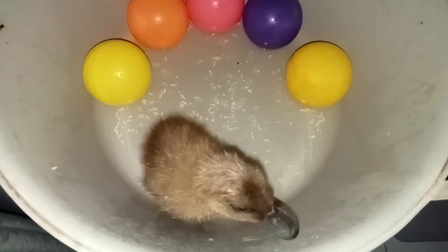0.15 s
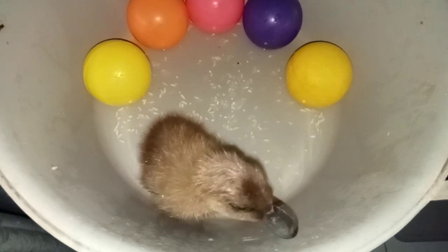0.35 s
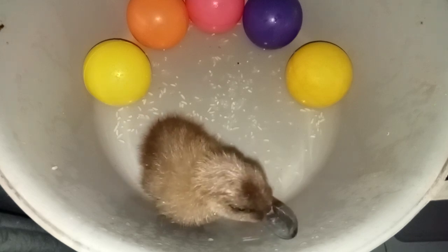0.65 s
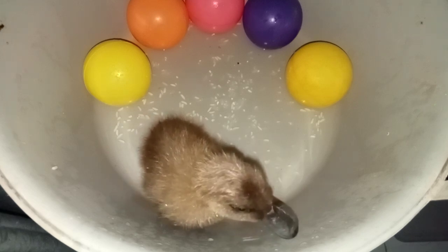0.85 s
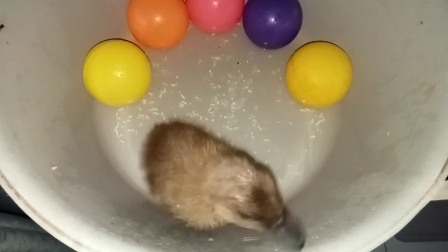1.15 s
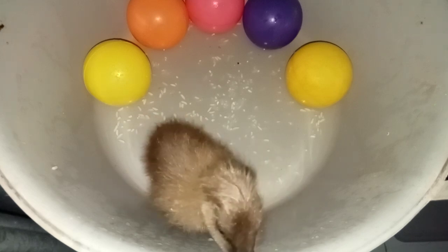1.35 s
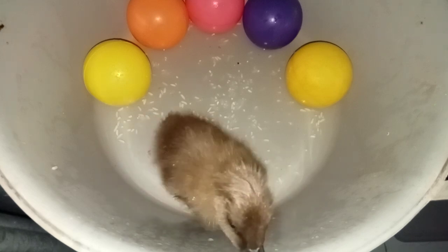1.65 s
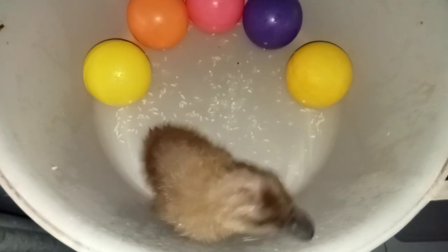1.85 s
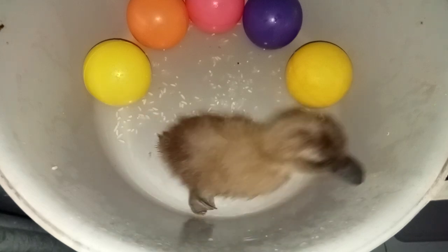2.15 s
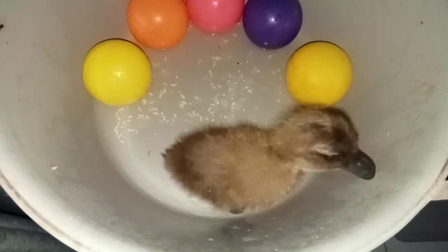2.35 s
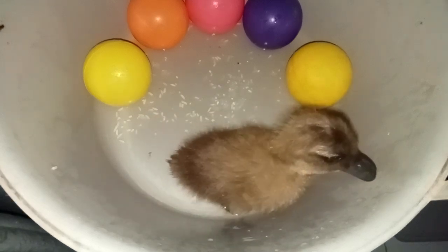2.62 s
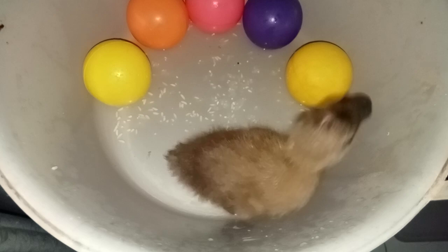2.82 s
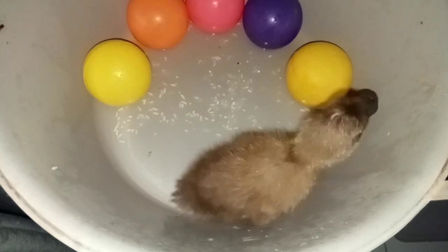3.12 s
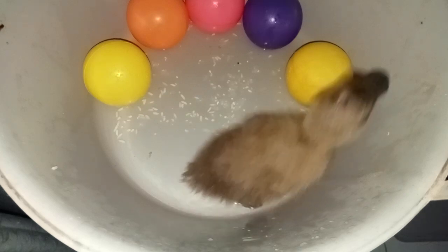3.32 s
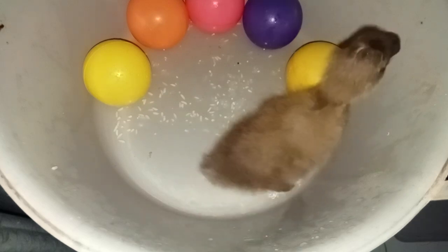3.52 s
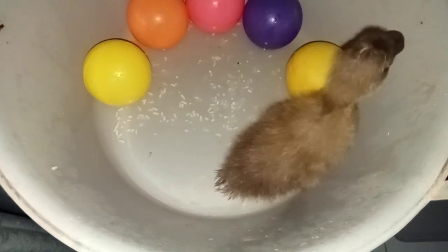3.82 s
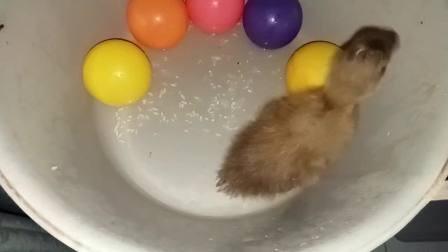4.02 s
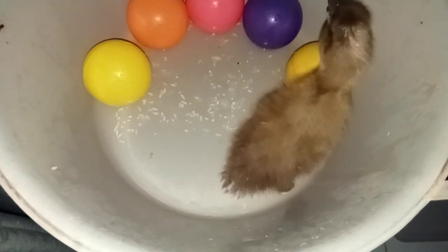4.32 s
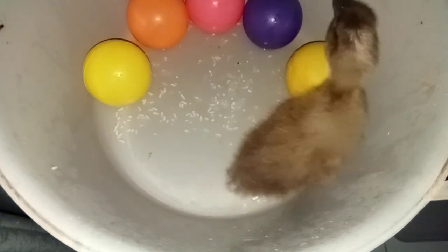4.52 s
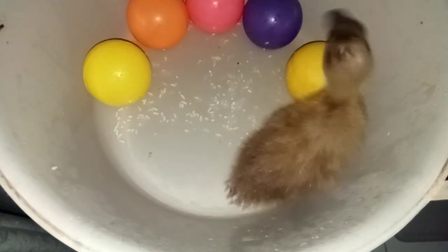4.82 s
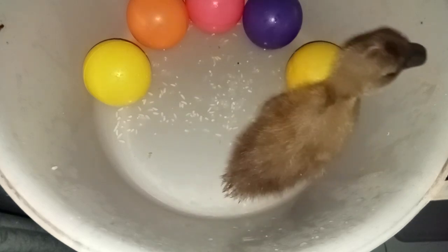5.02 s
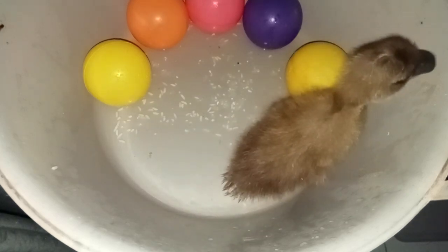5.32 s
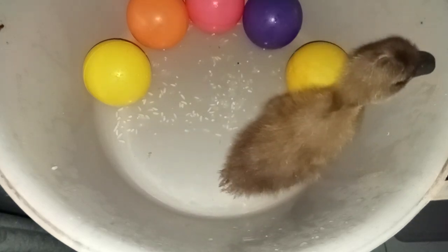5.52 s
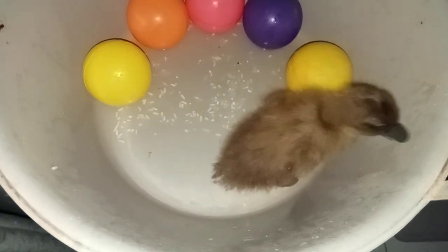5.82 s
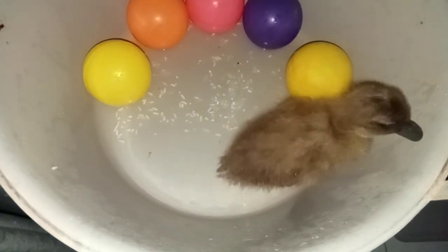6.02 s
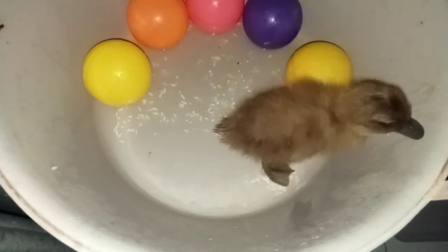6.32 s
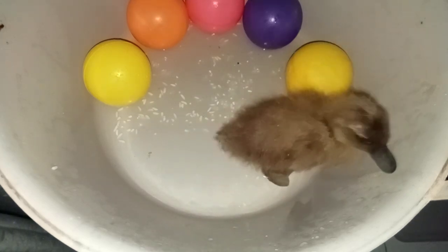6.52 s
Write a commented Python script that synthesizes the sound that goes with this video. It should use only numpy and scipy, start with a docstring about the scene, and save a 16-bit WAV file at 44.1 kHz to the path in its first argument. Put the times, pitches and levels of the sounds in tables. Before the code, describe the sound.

Thin whistled duckling calls, each scooping up and dropping off quickly, repeat at an even pace in a small reverberant indoor space. They grow from timid to piercing, interrupted by a crisp scuff of claws or bill on plastic, then rasp and weaken. After a short pause, a foot taps and a last quiet peep follows. Close mono microphone, faint hum and rumble.

```python
"""A duckling peeps about four times a second, close by, in a plastic bucket in a small hard room.
Each peep is a whistle with four overtones that scoops up, climbs and drops; the first are soft,
and the last whole ones turn hoarse as the cycles of the voice grow uneven.
Scuffs are grains of friction, taps ring the modes of the plastic, and thuds are dull low noise.
The room answers with dying noise; a faint hum, hiss and rumble lie below."""
import sys
import numpy as np
from scipy import signal
from scipy.fft import rfft, irfft, next_fast_len
from scipy.io import wavfile

SR = 44100
rng = np.random.default_rng(int(sys.argv[2]) if len(sys.argv) > 2 else 0)


def voltage_ratio(decibels):
    """Convert decibels (scalar or array-like) to amplitude ratios, 20 dB per decade."""
    exponent = np.asarray(decibels, float) / 20
    return 10 ** exponent


def file_out(sig):
    """Save sig as 16-bit WAV at sys.argv[1]."""
    # one column per channel
    cols = np.atleast_2d(sig).T
    # limit, then scale
    lim = np.clip(cols, -1, 1)
    pcm = np.round(lim * 32767).astype(np.int16)
    wavfile.write(sys.argv[1], SR, pcm)


N = 293706

# full peeps: start_s, length_s, low_pitch_hz, top_pitch_hz, strength_db
FULL_PEEPS = [(1.467, 0.09, 2690, 3022, -23), (1.736, 0.1, 2882, 3260, -19.5),
              (2, 0.095, 2565, 3239, -18.5), (2.258, 0.099, 3060, 3425, -18.5),
              (2.52, 0.1, 3110, 3512, -16.5), (2.78, 0.11, 3075, 3545, -16.5),
              (3.036, 0.1, 2808, 3417, -17), (3.298, 0.11, 3050, 3582, -14), (3.551, 0.12, 3010, 3528, -16),
              (3.814, .11, 3101, 3601, -13), (4.074, .112, 3184, 3592, -14.5),
              (4.33, 0.11, 3138, 3636, -16.5), (4.586, 0.11, 3016, 3628, -15),
              (4.849, .11, 3176, 3717, -14.5), (5.107, 0.11, 3137, 3634, -14.5),
              (5.368, 0.11, 3241, 3685, -12.5), (5.627, 0.11, 3199, 3772, -12.5),
              (6.664, 0.088, 2996, 3470, -26.5)]
# soft first peeps with a long deep scoop: start_s, length_s, low_pitch_hz, top_pitch_hz, strength_db
SOFT_PEEPS = [(-.07, .1, 2820, 2804, -31.5), (0.299, 0.091, 2778, 2866, -28),
              (.626, 0.079, 2844, 2992, -24.5), (0.918, 0.092, 3000, 3152, -26.5),
              (1.198, 0.093, 2977, 3164, -24)]
# forced peeps leap to the top early and sag: start_s, length_s, climb_s, top_pitch_hz, strength_db
FORCED_PEEPS = [(5.887, 0.086, .024, 3910, -15.5), (6.142, 0.078, .042, 3846, -16),
                (6.397, 0.071, .052, 3657, -20.5)]
# way of climbing, blended between rows: time_s, rest_before_climb_s, share_in_quick_step, step_delay_s
CLIMBING = [(.3, .025, .75, .035), (.92, .027, .4, .036), (1.2, .006, .8, .033), (1.46, .013, .26, .039),
            (1.74, .009, .5, .027), (2, 0, .27, .031), (2.26, .016, .23, .033), (2.52, .01, .33, .028),
            (3.04, .006, .22, .037), (3.3, .006, .36, .031), (3.55, .023, .15, .038), (3.81, .03, .3, .038),
            (4.6, .027, .2, .035), (4.85, .028, .23, .028), (5.11, .006, .09, .046),
            (5.36, .026, .13, .043), (5.63, .006, .17, .035)]
# scoops that overshoot the low pitch and settle back: time_s, overshoot_share_of_pitch
OVERSHOOTS = [(.303, .072), (.626, .059), (.914, .053), (1.463, .079), (1.733, .015), (2.257, .046),
              (2.518, .031), (2.781, .062), (3.554, .055), (4.074, .031), (5.109, .026), (5.627, .025)]
# how wide the bill is held: time_s, level_db per harmonic number
BILL_BRIGHTNESS = [(0, -1.8), (.65, -3), (1.2, -0.9), (1.5, -1.8), (2, -1.5), (2.3, 2), (2.8, 0.6),
                   (3.3, -1.6), (3.8, -1.6), (4.1, .1), (4.6, -0.7), (5.1, -0.87), (5.65, -0.66), (5.9, 2),
                   (6.4, 1)]
# the whistle stands apart from its overtones, mostly fainter, until it catches: catch_s, level_before_db
LATE_WHISTLES = [(1.234, 4), (2.034, -4), (3.078, -0.5), (3.336, -7), (3.592, -9), (3.845, -21.5),
                 (4.371, -4), (4.89, -4.5), (5.898, -15), (6.153, -13), (6.41, -3)]
# reflections briefly strengthen or cancel the lowest harmonic: time_s, level_db
WHISTLE_INTERFERENCE = [(0.986, -1.5), (1.257, 1), (1.805, 5.5), (2.318, -5.5), (2.345, 4), (2.587, 4.5),
                        (2.847, 4.5), (3.105, -10), (3.123, 7), (3.353, 6.5), (3.395, -9), (3.603, 5.5),
                        (3.907, -8), (4.151, 5), (4.399, 7.5), (4.63, -9), (4.672, 6.5), (4.912, 7.5),
                        (4.938, -8), (5.204, 3.5), (5.436, 0), (5.461, 5.5), (5.717, 8), (6.188, 2),
                        (6.16, 2), (6.226, -7), (6.422, 5.5), (6.462, 1)]
# throat, bill, bucket and microphone colour each harmonic by where it lies: pitch_hz, level_db
PASSAGE = [(2600, -0.5), (2950, -9.5), (3080, 2.5), (3250, -0.5), (3500, 0), (3620, -1), (3750, -3.5),
           (4200, -3), (5700, -18), (6200, -12.5), (6900, -13), (7500, -22.5), (8600, -34.5), (9200, -15.5),
           (9800, -12.5), (10400, -18.5), (11000, -26), (11600, -39.5), (12600, -36.5), (14000, -44),
           (15500, -50)]
# long breaks of the voice, as phase swing: start_s, end_s, every_third_cycle_db, every_second_cycle_db,
# chaos_db
HOARSE_BREAKS = [(5.722, 5.745, -27, -27, -28), (5.887, 5.985, -19, -26, -15), (6.15, 6.228, -24, -22, -17),
                 (6.43, 6.458, -13, -34, -21), (6.458, 6.478, -30, -21, -18)]
# short cracks as a peep settles or gives way: time_s, chaos_db
VOICE_CRACKS = [(1.206, -20), (1.552, -30), (1.798, -33), (2.258, -27), (2.778, -16), (3.292, -14),
                (3.577, -13), (3.666, -19.5), (3.926, -25.5), (4.074, -27), (4.186, -42.5), (4.441, -18.5),
                (4.701, -17.5), (4.956, -17.5), (5.223, -23), (5.623, -27.5)]
# rubbing on the plastic: start_s, end_s, strength_db, brightness_db_per_octave, fade_t60_s
# (an end before the start: the stroke sets in already fading)
SCUFF_STROKES = [(0.467, 0.47, -39, -4.5, 0.27), (1.726, 1.76, -53.5, 1, 0.26),
                 (2.139, 2.36, -64, -3.5, 0.3), (2.635, 2.801, -53.5, -2.5, 0.26),
                 (2.989, 2.91, -13.5, 1, 0.18)]
# colour of the scuffs as the microphone hears them, plastic and microphone together, shape only:
# frequency_hz, level_db
SCUFF_COLOUR = [(150, -54), (600, -25), (1100, -14), (2200, -10), (5000, -14), (8600, -20.5), (9800, -2),
                (11500, -20), (15000, -50.5)]
# claw or bill on the wall: time_s, strength_db
TAP_HITS = [(2.983, -30.5), (3.002, -31), (3.013, -27), (6.535, -36.5)]
# ringing modes of the plastic wall: pitch_hz, relative_level_db, t60_s
WALL_MODES = [(493, -22, 0.065), (1480, -6.5, 0.008), (4520, -5, 0.009), (9730, -5.5, 0.0036),
              (13500, -11.5, .002)]
# a foot lands on the floor of the bucket: time_s, strength_db, t60_s
FOOT_THUDS = [(2.17, -61, 0.52), (2.655, -57.5, 0.6), (6.536, -49.5, 0.26), (6.631, -65.5, 0.5)]
# how long the room rings: frequency_hz, t60_s
ROOM_T60 = [(500, 0.1), (3500, 0.24), (13000, 0.23)]
# colour of the hiss and rumble, shape only: frequency_hz, level_db
HISS_COLOUR = [(24, -84), (40, -12.5), (87, -5.5), (158, -12.5), (197, -14), (273, -15.5), (998, -21.5),
               (1380, -22), (15500, -38)]
# hum: pitch_hz, rms_level_db
HUM_TONES = [(199.2, -77.5)]

SCOOP_S, SCOOP_DEPTH, SCOOP_DB = 0.011, 0.2, 5   # starts flat by a share of the pitch, with a small pip
SOFT_SCOOP_S, SOFT_SCOOP_DEPTH = 0.024, 0.3
DROP_S, DROP_DEPTH, DROP_DB = 0.016, 0.45, -22.5   # ends by sliding down as the air runs out
OVERSHOOT_S = 0.015   # settling time of an overshoot
CLIMB_BEND = 1.4   # above 1 the climb slows down toward the top
STEP_S = 0.0035   # time scale of the quick step within a climb
FORCED_FROM_HZ = 3200
SAG_HZ_PER_S2 = 115000   # the longer the climb, the faster the sag: Hz per s for each s of climb
ONSET_DB, ONSET_S = -7.5, 0.0057   # the breath builds up
SWELL_DB = -5   # and is this much weaker until the pitch has climbed
FADE_DB, FADE_S = -3, 0.0077   # then gives way just before the end
THIN_DB = -7   # per harmonic number, far out in the scoop; half of it in the drop
INTERFERENCE_S, CATCH_S, FAINT_S = 0.012, 0.002, 0.04
FLUTTER_DB = 1.6   # rms wavering of each harmonic on its own
CHAOS_FLOOR_DB = -32   # chaos that is always in the voice
CRACK_S = 0.01


def rms_one(x):
    """Scale to rms 1."""
    return x / np.sqrt(np.mean(x ** 2) + 1e-20)


def coloured(x, spectrum, slope_db=0):
    """Shape x by (Hz, dB) points and a slope per octave about 2 kHz; rms 1."""
    size = next_fast_len(len(x))
    octave = np.log2(np.arange(size // 2 + 1) * SR / size + 1)
    hz, db = np.transpose(spectrum)
    gain = voltage_ratio(np.interp(octave, np.log2(hz), db) + slope_db * (octave - np.log2(2000)))
    return rms_one(irfft(rfft(x, size) * gain, size)[:len(x)])


def band(x, low_hz, high_hz):
    """Band-pass."""
    return signal.sosfilt(signal.butter(2, [low_hz, min(high_hz, .45 * SR)], "band", fs=SR, output="sos"), x)


def high_pass(x, order, hz):
    """Take away what lies below hz."""
    return signal.sosfilt(signal.butter(order, hz, "high", fs=SR, output="sos"), x)


def noise_band(low_hz, high_hz):
    """Band of noise over the whole scene, rms 1."""
    return rms_one(band(rng.standard_normal(N), low_hz, high_hz))


def gate(start, end, edge):
    """1 between two times, with linear edges."""
    t = np.arange(N) / SR
    return np.clip(np.minimum(t - start, end - t) / edge + .5, 0, 1)


def duckling():
    """A whistle with overtones; where the voice breaks, cycles alternate in threes or twos and wobble."""
    pitch, held, breath, whistle, thin, fade = phrasing()
    heights = []
    for k in range(1, 6):
        level_db = breath + np.interp(k * held, *np.transpose(PASSAGE)) + k * thin
        level_db = level_db + (k == 1) * whistle + FLUTTER_DB * noise_band(9.5, 60)
        heights.append(np.sqrt(2) * fade * voltage_ratio(level_db))
    phase = 2 * np.pi * np.cumsum(pitch) / SR
    swing, chaos = uneven_cycles(phase)
    # pitch jitter smears the overtones
    phase += 1.6 * chaos * rms_one(band(band(rng.standard_normal(N), 40, 300), 40, 300))
    steady, swung = (sum(h * np.sin(k * p + k * k) for k, h in enumerate(heights, 1))
                     for p in (phase, phase + swing))
    rasp = swung - steady + 0.85 * heights[0] * swing   # uneven cycles also push air of their own
    rasp = high_pass(rasp, 2, 4200)   # a small bill radiates lows poorly
    return high_pass(steady + rasp, 4, 1000)


def phrasing():
    """Pitch, held pitch, breath, whistle and harmonic gains (dB) and fade of the voice through all peeps."""
    t = np.arange(N) / SR
    pitch, held = np.full((2, N), 3000.)
    breath, fade, thin = np.zeros((3, N))
    whistle = sum(db * np.exp(-((t - s) / INTERFERENCE_S) ** 2) for s, db in WHISTLE_INTERFERENCE)
    when, *ways = np.transpose(CLIMBING)
    full, soft = (SCOOP_S, SCOOP_DEPTH), (SOFT_SCOOP_S, SOFT_SCOOP_DEPTH)
    calls = [(s, length, length, low, top, db, *full) for s, length, low, top, db in FULL_PEEPS]
    calls += [(s, length, length, low, top, db, *soft) for s, length, low, top, db in SOFT_PEEPS]
    calls += [(s, length, climb, FORCED_FROM_HZ, top, db, *full)
              for s, length, climb, top, db in FORCED_PEEPS]
    for s, length, top_at, low_hz, top_hz, db, scoop, depth in calls:
        overshoot = sum(share for at, share in OVERSHOOTS if abs(at - s) < length / 2)
        # forced peeps climb at once, with neither rest nor step
        rest, step, step_at = [np.interp(s, when, way) * (top_at == length) for way in ways]
        on = (t > s - scoop) & (t < s + length + DROP_S)
        age = np.clip(t[on] - s, 0, length)
        early = np.clip((s - t[on]) / scoop, 0, 1)   # 1 to 0 through the scoop
        late = np.clip((t[on] - s - length) / DROP_S, 0, 1) ** 2   # 0 to 1 through the drop
        glide = 1 - (1 - np.clip((age - rest) / (top_at - rest), 0, 1)) ** CLIMB_BEND
        climbed = (1 - step) * glide + step / (1 + np.exp((step_at - age) / STEP_S))
        sag = SAG_HZ_PER_S2 * top_at * np.maximum(age - top_at, 0)
        hz = low_hz + (top_hz - low_hz) * climbed - sag
        held[on] = hz
        pitch[on] = hz * (1 + overshoot * np.exp(-age / OVERSHOOT_S) - depth * early ** 2 - DROP_DEPTH * late)
        for catch, before_db in LATE_WHISTLES:
            if s < catch < s + length:
                uncaught = 1 / (1 + np.exp((age + s - catch) / CATCH_S))
                # half the change is there at the start, all of it after half of FAINT_S
                whistle[on] += before_db * uncaught * np.minimum(.5 + age / FAINT_S, 1)
        breath[on] = (db + ONSET_DB * np.exp(-age / ONSET_S) + SWELL_DB * (1 - climbed)
                      + FADE_DB * np.exp((age - length) / FADE_S))
        edge_gain = voltage_ratio(SCOOP_DB * np.sin(np.pi * early) + DROP_DB * late)
        fade[on] = (1 - early) ** 0.71 * (1 - late ** 4) * edge_gain
        thin[on] = THIN_DB * (early + late / 2) + np.interp(s, *np.transpose(BILL_BRIGHTNESS))
    return pitch, held, breath, whistle, thin, fade


def uneven_cycles(phase):
    """Phase swing of a breaking voice: subharmonics and chaos; also returns the amount of chaos."""
    floor = voltage_ratio(CHAOS_FLOOR_DB)
    third, second, chaos = np.zeros(N), np.zeros(N), np.full(N, floor)
    for start, end, third_db, second_db, chaos_db in HOARSE_BREAKS:
        g = gate(start, end, 0.0022)
        third += g * voltage_ratio(third_db)
        second += g * voltage_ratio(second_db)
        chaos += g * voltage_ratio(chaos_db)
    for s, db in VOICE_CRACKS:
        chaos += voltage_ratio(db) * gate(s - CRACK_S / 2, s + CRACK_S / 2, 0.0019)
    # chaos: longer cycle patterns that come and go within hundredths of a second, and plain wobble
    *comes, unsteady = [noise_band(12, 80) for _ in range(5)]
    patterns = sum(c * np.cos(phase * share) for c, share in zip(comes, (1 / 7, 1 / 4, 2 / 5, 3 / 5)))
    wobble = .62 * patterns * (1 - floor / chaos) + .22 * noise_band(150, 3000)
    alternating = third * np.cos(phase / 3) + second * np.cos(phase / 2)
    return (1 + 1.4 * unsteady) * alternating + chaos * wobble, chaos


def scuffs():
    """Dense uneven grains of friction, coloured by plastic and microphone, fading after each stroke."""
    out, size = np.zeros(N + SR), SR // 3
    t = np.arange(size) / SR
    for start, end, db, slope_db, t60 in SCUFF_STROKES:
        grains = rng.standard_normal(size) * voltage_ratio(4.5 * np.minimum(rng.exponential(1, size), 4))
        fading_s = np.maximum(t - end + start, 0)
        stroke = np.clip(t / 0.0098, 0, 1) * voltage_ratio(db - 60 * fading_s / t60)
        out[int(start * SR):][:size] += stroke * coloured(grains, SCUFF_COLOUR, slope_db)
    return out[:N]


def taps():
    """Claw or bill on the wall: each click rings the wall's modes with strengths of its own."""
    at, out = [round(s * SR) for s, db in TAP_HITS], np.zeros(N)
    strength_db = np.array(TAP_HITS)[:, 1]
    chance_db = rng.normal(0, 1, (len(at), len(WALL_MODES)))
    for (hz, db, t60), spread in zip(WALL_MODES, chance_db.T):
        clicks = np.full(N, 1e-18)
        clicks[at] = voltage_ratio(strength_db + db - 2.5 + spread)
        r, w = voltage_ratio(-60 / (t60 * SR)), 2 * np.pi * hz / SR   # decay and turn of the mode per sample
        out += signal.lfilter([0, np.sin(w)], [1, -2 * r * np.cos(w), r * r], clicks)
    clicks = np.zeros(N)
    clicks[at] = voltage_ratio(strength_db - 17)   # the bare click of contact
    return out + band(clicks, 1800, 15000)


def thuds():
    """Feet on the bucket floor: dull low noise that sets in at once and dies away."""
    t = np.arange(N) / SR
    shape = sum((t > s) * voltage_ratio(db - 60 * np.abs(t - s) / t60) for s, db, t60 in FOOT_THUDS)
    return band(shape * noise_band(45, 350), 45, 1110)


def room(x):
    """Diffuse echoes of a small hard room: noise that dies away, the lows soonest."""
    delay_s, level_db = 0.0039, -10.5
    t = np.arange(SR // 2) / SR
    hz, t60 = np.transpose(ROOM_T60)
    edges = np.geomspace(100, 16000, 9)
    tail = np.zeros(len(t))
    for low, high in zip(edges, edges[1:]):
        decay = voltage_ratio(-60 * t / np.interp(np.sqrt(low * high), hz, t60))
        tail += band(rng.standard_normal(len(t)), low, high) * decay
    tail = tail * np.clip(t / delay_s - 1, 0, 1)   # silent for the delay, then rising over as long again
    return voltage_ratio(level_db) * signal.fftconvolve(x, tail / np.sqrt(np.sum(tail ** 2)))[:N]


def background():
    """Steady hiss and rumble of shaped noise, with a wavering hum of narrow noise."""
    hiss = voltage_ratio(-66) * coloured(rng.standard_normal(N), HISS_COLOUR)
    hum = sum(voltage_ratio(db) * noise_band(hz - 4, hz + 4) for hz, db in HUM_TONES)
    return hiss + hum


def scene():
    """Everything in the bucket rings in the room, over the background, at one microphone."""
    near = duckling() + scuffs() + taps() + thuds()
    return (near + room(near) + background())[None]


def band_limit(x):
    """A steep low-pass at the top of the band."""
    return signal.sosfilt(signal.butter(12, 15760, fs=SR, output="sos"), x)


def record(dry):
    """The mono microphone mix as it is kept."""
    return band_limit(dry)


dry = scene()
out = record(dry)
file_out(out)
```